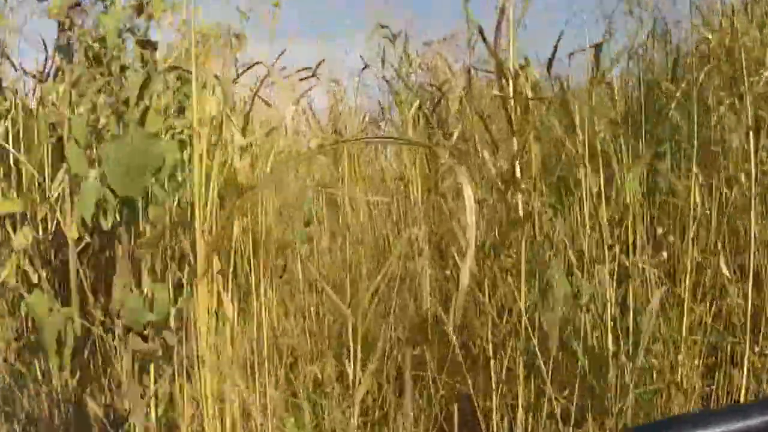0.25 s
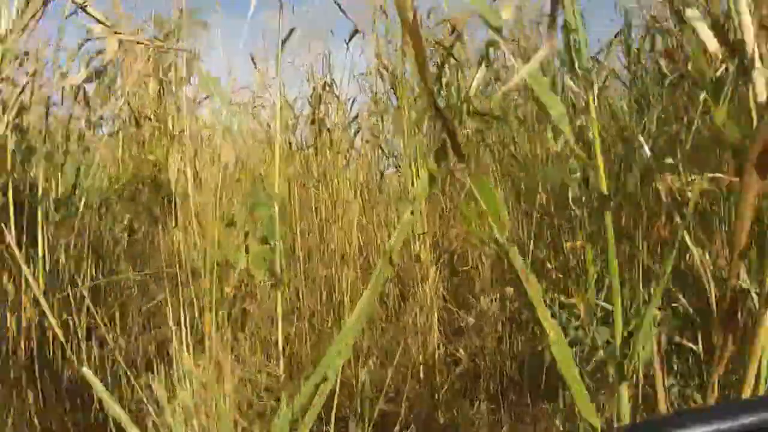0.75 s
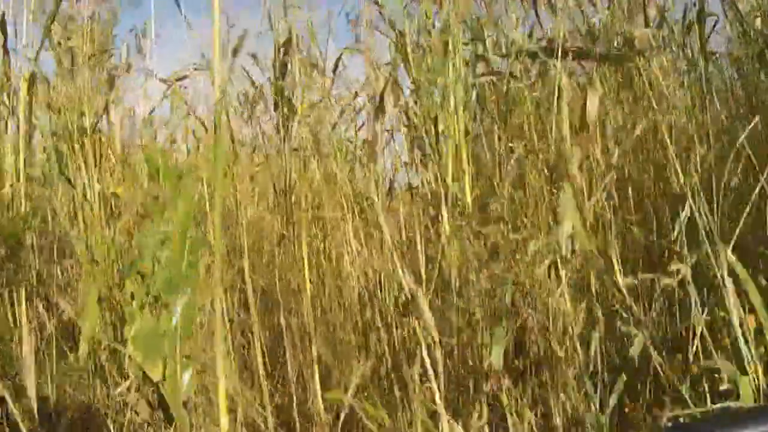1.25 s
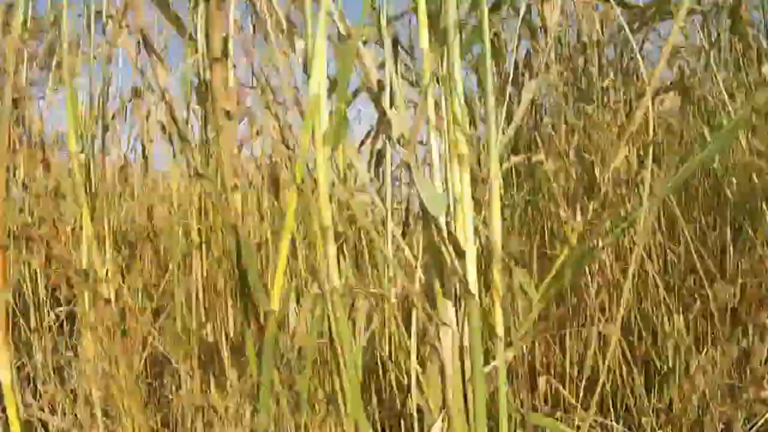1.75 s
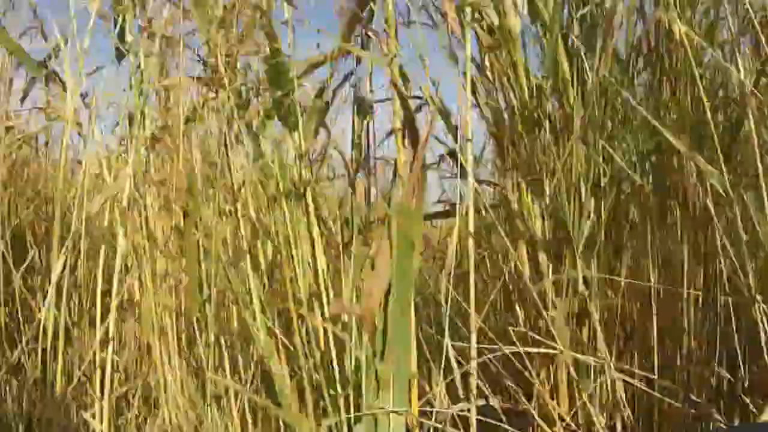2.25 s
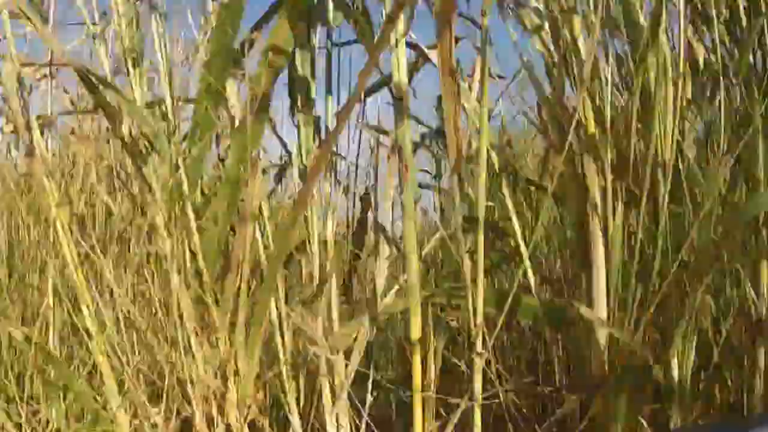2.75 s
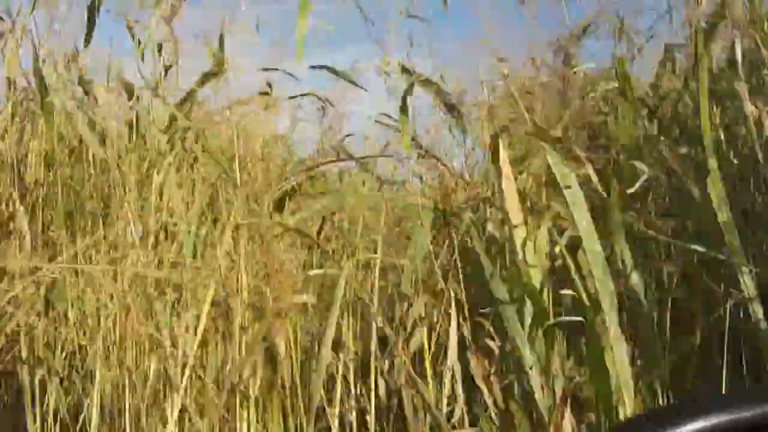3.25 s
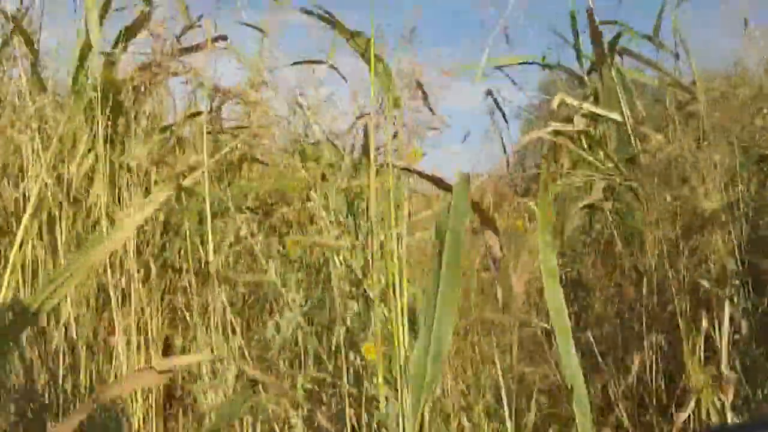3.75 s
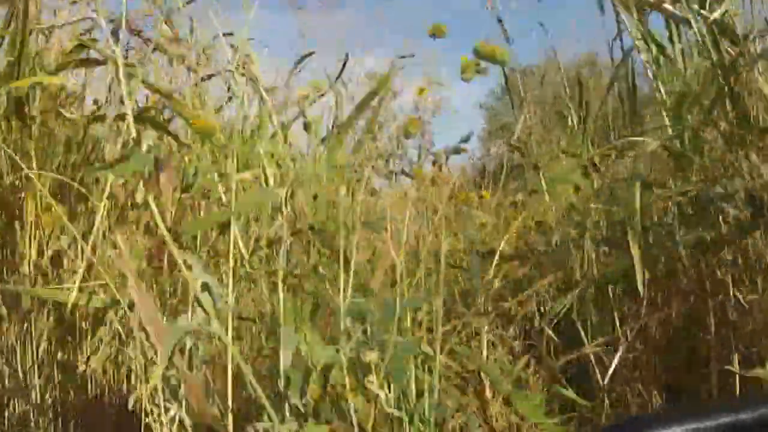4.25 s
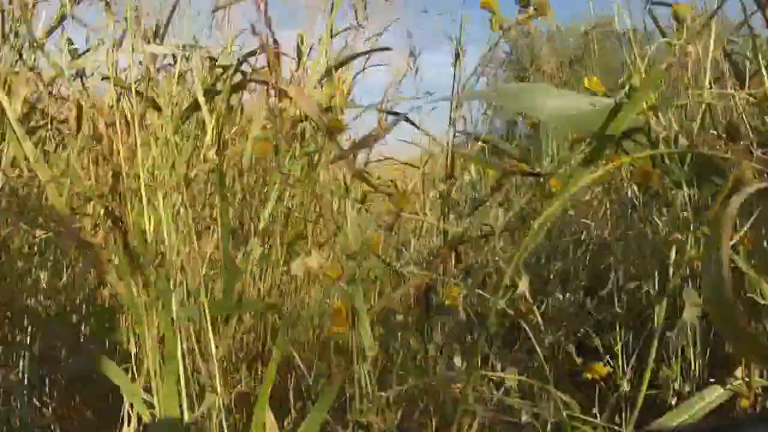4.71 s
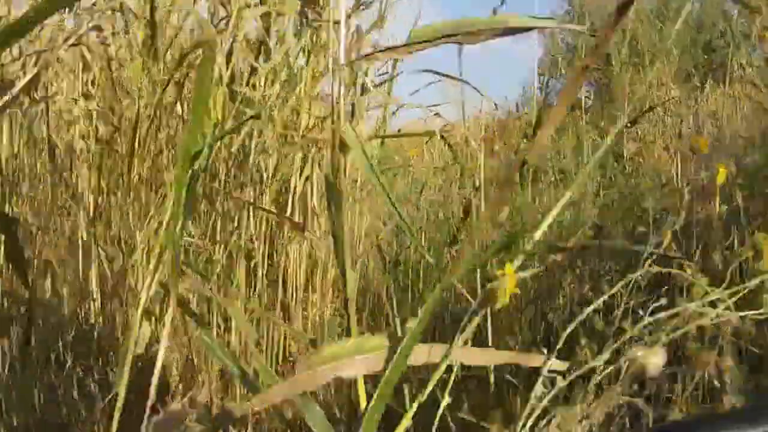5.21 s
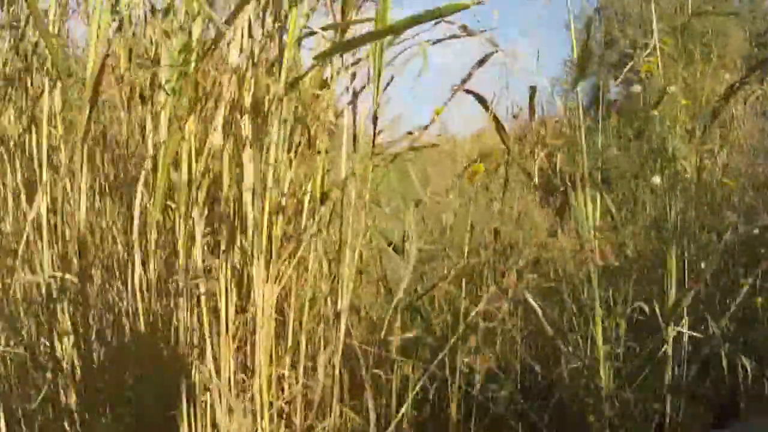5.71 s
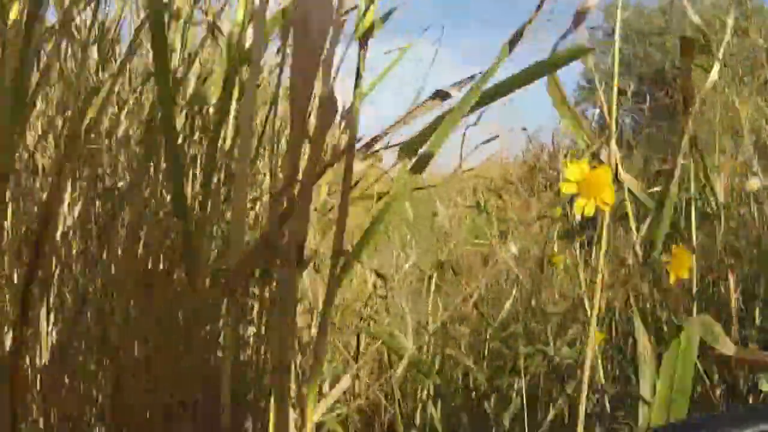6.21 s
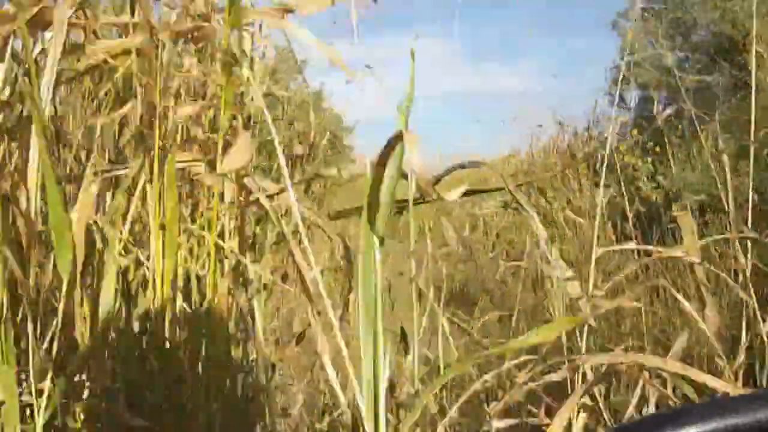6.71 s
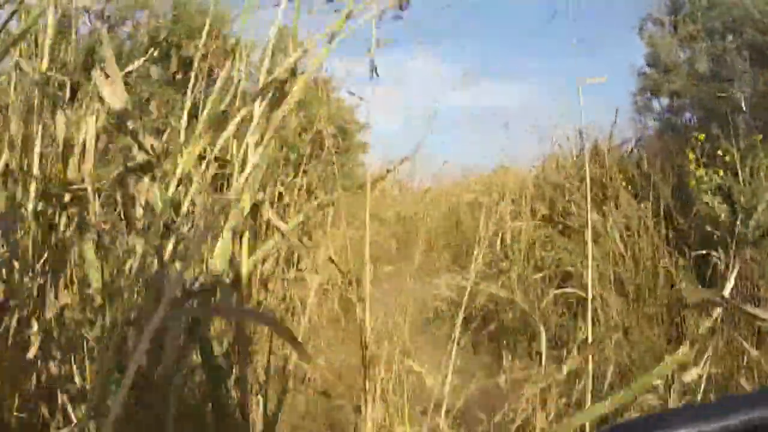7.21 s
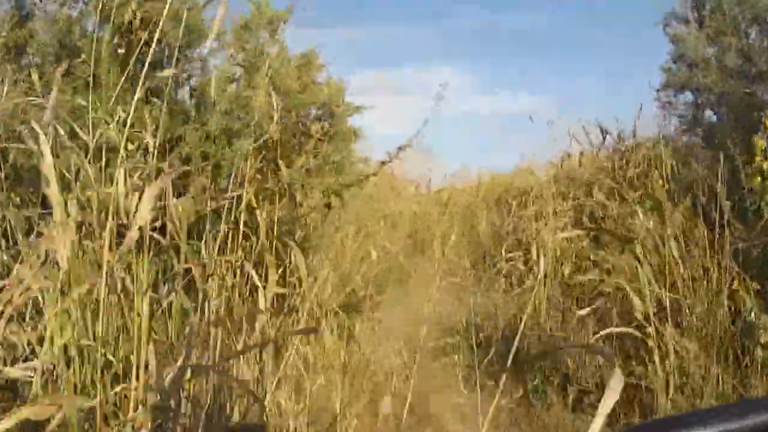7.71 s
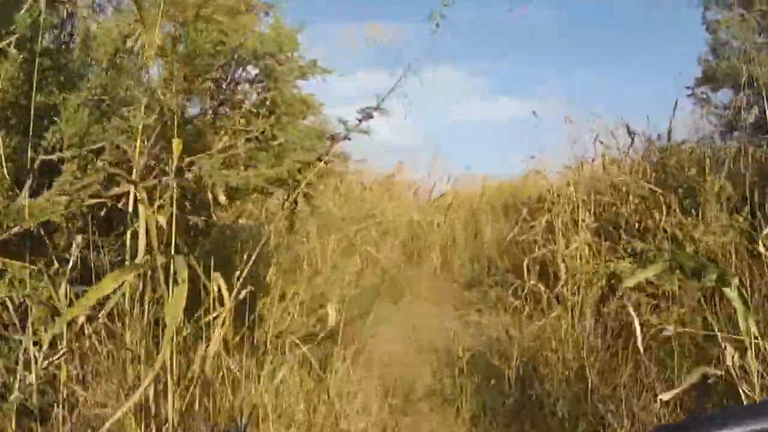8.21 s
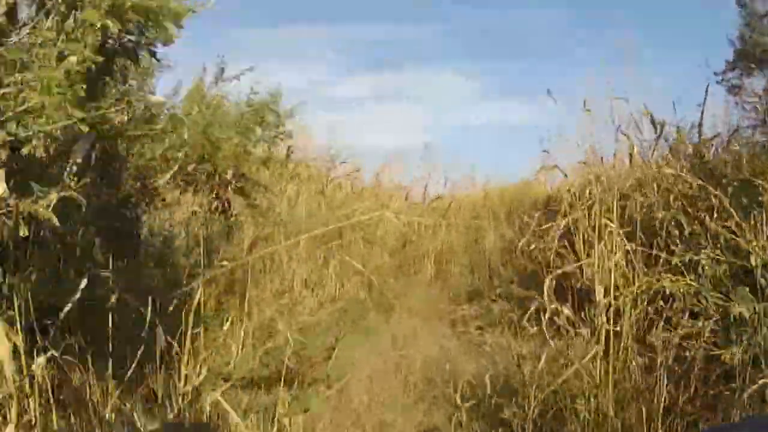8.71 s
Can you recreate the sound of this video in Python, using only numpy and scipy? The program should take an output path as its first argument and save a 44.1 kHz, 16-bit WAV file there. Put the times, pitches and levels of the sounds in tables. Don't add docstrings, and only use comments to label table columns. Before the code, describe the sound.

Close, boxy engine drone with heavy low vibration and hard plastic rattle, running without a break. Dry leaves scrape over the casing in crackling swells, while stalks knock, tick and snap against it. The strongest whacks come early, around the middle and later on, with the sound ducking and recovering. Toward the end the engine settles lower and the brushing thins. Coarse, slightly metallic treble.

```python
import sys
import numpy as np
from scipy import signal
from scipy.io import wavfile
from scipy.ndimage import uniform_filter1d

SR = 44100
rng = np.random.default_rng(int(sys.argv[2]) if len(sys.argv) > 2 else 0)


def generate_wav(signal):
    frames = np.transpose(np.atleast_2d(signal))
    scaled = np.clip(frames, -1, 1) * 32767
    pcm = np.round(scaled).astype(np.int16)
    wavfile.write(sys.argv[1], SR, pcm)


def convert_level_to_amplitude(level_db):
    exponent = np.asarray(level_db, float) / 20
    return 10 ** exponent


N = 395136
T = np.arange(N) / SR

# start [s], peak level [dB], pitch [Hz], width [Hz], recorder overload [dB].
SLAPS = [(1.5468, -2, 5000, 3000, 0), (1.5472, 0, 2900, 1500, 7), (2.1226, -1, 1750, 900, 7),
         (2.8016, -14, 3500, 4000, 0), (3.1472, -9, 3400, 4000, 1.5), (4.2962, -20, 2600, 400, 0),
         (4.7906, -1, 300, 1100, 8), (4.7913, -14, 4600, 3000, 0), (4.7917, -3, 2650, 600, 0),
         (5.3192, -28, 5500, 4000, 0), (5.5142, -28, 5500, 4000, 0), (5.5692, -27, 5500, 4000, 0),
         (5.6809, 1, 2250, 700, 10), (5.6811, -5, 5000, 3500, 0), (5.6813, -6, 800, 900, 0),
         (6.9682, -17, 1800, 900, 0), (7.3682, -8, 2650, 900, 2)]
# start [s], peak level [dB], pitch [Hz], width [Hz], recorder overload [dB].
KNOCKS = [(.5882, -16, 1700, 700, 1), (1.1012, -8, 2000, 500, .5), (1.1016, -24, 5500, 900, 0),
          (1.1502, -20, 1100, 600, 8), (1.3952, -18, 1100, 600, 6), (1.4262, -12, 1100, 900, 0),
          (2.1252, -11, 1470, 200, 0), (2.1332, -10, 2200, 200, 0), (3.3812, -12, 1100, 900, 0),
          (3.5862, -10, 2100, 900, 0), (4.2432, -10, 2350, 70, 6), (5.9032, -8, 2200, 500, 6),
          (6.6962, -14, 1950, 300, 0), (7.4212, -12, 2000, 250, 0), (8.6652, -13, 1100, 700, 0)]


def rms_one(x):
    return x / np.sqrt(np.mean(x ** 2) + 1e-20)


def drift(rate):
    r = np.exp(-80 * np.pi * rate / SR)
    noise = rng.standard_normal(N // 40 + 2002)
    slow = signal.lfilter([1], [1, -2 * r, r * r], noise)[2000:]
    return np.interp(np.arange(N) / 40, np.arange(len(slow)), rms_one(slow))


def resonance(x, hz, width_hz):
    r = np.exp(-np.pi * width_hz / SR)
    zeros = np.array([1, 0, -1]) * (1 - r * r) / 2
    return signal.lfilter(zeros, [1, -2 * r * np.cos(2 * np.pi * hz / SR), r * r], x)


def steep_resonance(x, hz, width_hz):
    return resonance(resonance(x, hz, width_hz), hz, width_hz)


def case(push, modes, patchy_db):
    ringing = np.zeros(N)
    for k, (hz, width_hz, db) in enumerate(modes):
        level = convert_level_to_amplitude(db + patchy_db * drift(3.8))
        ringing += (-1) ** k * level * resonance(push, hz, width_hz)
    return rms_one(ringing)


def crank():
    # time [s], firing rate [firings per s].
    speed = [(0.0, 33.1), (0.7, 38.3), (1.1, 39.45), (1.7, 38.03), (2.13, 37.45), (2.55, 34.0),
             (2.8, 33.25), (3.6, 32.5), (4.3, 32.75), (4.8, 32.5), (5.35, 35.65), (5.9, 38.1), (6.45, 39.3),
             (6.75, 38.8), (7.25, 34.9), (7.65, 34.4), (8.0, 33.5), (8.96, 33.75)]
    rate = np.interp(T, *np.transpose(speed))
    slip = .3 * np.interp(T, [.17, .24], [1, 0])
    return rate, np.cumsum(rate) / SR + .03 + slip


def rumble(low_db):
    # centre [Hz], width [Hz], rms level [dB].
    bands = [(60, 95, -31), (117, 98, -39), (161, 81, -43), (435, 324, -39.5), (700, 640, -42.5),
             (1650, 880, -49)]
    shudder = np.zeros(N)
    for hz, width_hz, db in bands:
        band = rms_one(steep_resonance(rng.standard_normal(N), hz, width_hz))
        shudder += convert_level_to_amplitude(db + 1.9 * drift(3.0)) * band
    return shudder * convert_level_to_amplitude(0.93 * (low_db + 22.5))


def swishes():
    # centre time [s], length [s], level [dB], pitch [Hz], width [Hz].
    slides = [
        (.19, .09, -46, 5400, 1000),
        (1.46, .09, -38, 5400, 1000),
        (8.69, .07, -42, 5300, 1300),
    ]
    noise, out = rng.standard_normal(N), np.zeros(N)
    for s, length, db, hz, width_hz in slides:
        swell = np.exp(-(2 * (T - s) / length) ** 2)
        out += convert_level_to_amplitude(db) * swell * rms_one(steep_resonance(noise, hz, width_hz))
    return out


def brushing():
    # time [s], level [dB].
    grass = [(.1, -52), (.35, -44), (.6, -47), (1.0, -37), (1.5, -36), (1.7, -40), (1.9, -34.5),
             (2.45, -40.5), (2.7, -47), (3.05, -37.5), (3.3, -45.5), (4.25, -45), (4.6, -44), (5.4, -41),
             (6.85, -34.5), (7.6, -39), (8.2, -46), (8.7, -41.5)]
    # pitch [Hz], width [Hz], level [dB].
    brush_modes = [(2655, 100, 2), (3150, 270, -2.5), (3670, 125, 1.5), (3770, 122, 0), (4220, 25, -4),
                   (4630, 250, -19), (5060, 90, -29), (5590, 2400, -27), (5630, 370, -8)]
    brush_db = np.interp(T, *np.transpose(grass)) - 0.4 * drift(12.0)
    born = rng.random(N) < 250 * convert_level_to_amplitude(5.0 * drift(12.0)) / SR
    grain_db = 5.6 * np.minimum(rng.exponential(1, N), 4)
    grains = born * convert_level_to_amplitude(grain_db) * rng.choice([-1, 1], N)
    hiss = 0.88 * convert_level_to_amplitude(2.8 * drift(41.0)) * rng.standard_normal(N)
    return convert_level_to_amplitude(brush_db) * case(rms_one(grains) + hiss, brush_modes, patchy_db=1.2)


def burst(noise, hz, width_hz, t60, rise):
    t = np.arange(len(noise)) / SR
    contact = noise + 130 / width_hz * np.sin(2 * np.pi * hz * t)
    envelope = convert_level_to_amplitude(-60 * t / t60) * (1 - np.exp(-t / rise))
    rung = steep_resonance(contact * envelope, hz, 1.5 * width_hz)
    return rung / np.max(np.abs(rung))


def rattle_ticks():
    # start [s], length [s], peak level [dB], loss on every second tap [dB], case modes [dB].
    leans = [
        (1.1428, .19, -22, 7, 10),
        (1.4032, .12, -18, 1, 4),
        (1.5818, .09, -26, 4, 3),
        (5.2624, .17, -20, 5, 0),
        (5.483, .15, -16, -1, 0),
        (5.7807, .04, -22, 1, 0),
    ]
    pitch_hz, spread_db = 3090, 6
    turns, rows = crank()[1], []
    chances = rng.standard_normal((len(leans), 12, 2))
    for (start, length, db, weak_db, body_db), chance in zip(leans, chances):
        first, last = np.interp([start, start + length], T, turns)
        for k, s in enumerate(np.interp(np.arange(first, last), turns, T)):
            late = .001 * chance[k, 0] * (k > 0)
            tap_db = db - weak_db * (k % 2) + spread_db * chance[k, 1]
            rows.append((s + late, tap_db, pitch_hz, body_db))
    return rows


def stalks():
    # start [s], peak level [dB], pitch [Hz], case modes above the tick [dB].
    lone_ticks = [(0.325, -40, 3720, 33), (0.9093, -41, 2870, 5), (1.0839, -32, 3180, 5),
                  (1.733, -14, 4030, 7), (1.7853, -36, 3630, 5), (1.8292, -19.5, 3620, 2),
                  (2.126, -16, 2720, 1), (2.3301, -24, 3000, 23), (2.5237, -26, 2800, 3),
                  (2.801, -20.5, 2870, 18), (3.148, -18, 3560, -14), (3.4116, -21, 2890, -1),
                  (3.5896, -27, 3070, 18), (4.2468, -19, 4570, 16), (4.2945, -26, 4120, -6),
                  (4.362, -30, 3100, -14), (4.577, -19.5, 3050, -5), (4.607, -21, 3090, -4),
                  (5.681, -11, 3190, -5), (5.9843, -32, 2950, 15), (6.132, -27, 3670, 14),
                  (6.3, -21, 3140, 20), (6.9246, -21, 3300, 11), (6.9681, -23, 2800, 16),
                  (7.138, -18.5, 3660, 17), (7.3671, -10.5, 3660, 19.5), (7.4614, -16, 2720, -4),
                  (8.6678, -18, 3270, 0)]
    out = np.zeros(N + 4096)
    noises = rng.standard_normal((72, 3, 2048))
    for (s, db, hz, body_db), (crack, bright, dull) in zip([*lone_ticks, *rattle_ticks()], noises):
        tick = burst(bright, hz, width_hz=520, t60=.055, rise=.0012)
        tick += convert_level_to_amplitude(-22.0) * burst(crack, 4600, width_hz=3000, t60=.008, rise=.0002)
        thud = convert_level_to_amplitude(body_db - 9.5) * burst(dull, 2330, width_hz=580, t60=.035, rise=.0002)
        out[round(s * SR):][:2048] += convert_level_to_amplitude(db - 2.0) * (tick + thud)
    for blows, t60 in ((SLAPS, .014), (KNOCKS, .036)):
        noises = rng.standard_normal((len(blows), 4096))
        for (s, db, hz, width_hz, _), noise in zip(blows, noises):
            out[round(s * SR):][:4096] += convert_level_to_amplitude(db) * burst(noise, hz, width_hz, t60, rise=.0006)
    return out[:N]


def shake_db(rate):
    full_hz, loss_db_per_hz = 34.5, 0.24
    jolt_s, sink_s, back_s = 0.2, 0.029, .035
    away = np.where(T < jolt_s, (jolt_s - T) / sink_s, (T - jolt_s) / back_s)
    return -5 - loss_db_per_hz * np.maximum(rate - full_hz, 0) - 23 * np.exp(-away)


def group_db(shared, light_db, load_share, db_per_hz, wander_db):
    # time [s], level above light load [dB].
    load = [(0, -2.5), (.16, -1), (.25, 4), (1.0, 4), (1.5, 9), (1.9, 4.5), (2.4, 4.5), (2.72, -2),
            (3.1, 2), (3.28, -1.5), (4.4, -1), (5.1, -0.5), (5.4, 5.5), (6.0, 5), (7.1, 5), (7.6, 3),
            (8.0, -2.5), (8.6, -0.5)]
    load_db = load_share * np.interp(T, *np.transpose(load))
    wander = .7 * shared + .7 * drift(4.0)
    return light_db + load_db + db_per_hz * (crank()[0] - 33) + wander_db * wander


def firing_push(turns, clean, gate_db, uneven_db):
    at = np.flatnonzero(np.diff(np.floor(turns)))
    kicks = np.zeros(N)
    kick_db = uneven_db * rng.standard_normal(400)[:len(at)] - 0.78 * (np.arange(len(at)) % 2)
    kicks[at] = convert_level_to_amplitude(kick_db)
    flutter = .6 * drift(30.0) + .6 * drift(150.0)
    swell = convert_level_to_amplitude(gate_db * np.cos(2 * np.pi * (turns - .08)) + uneven_db * flutter)
    clatter = rms_one(swell * rng.standard_normal(N))
    return clean * rms_one(kicks) + np.sqrt(1 - clean ** 2) * clatter


def orders(rate, turns):
    # multiple of the firing rate, level at light load [dB], gain with speed [dB per Hz], lead [cycles].
    clean_orders = [(1.5, -36, 2.3, .15), (2, -29.5, .4, -.15), (2.5, -40, 1.9, .09), (3, -32, -.2, -.15),
                    (3.5, -47, 0, .45), (4, -43, 0, -.06), (5, -42, 0, -.4)]
    # pitch [Hz], half width [Hz], lift [dB].
    frame_modes = [(113, 5, 7), (140, 7, 13)]
    out = np.zeros(N)
    for multiple, db, db_per_hz, lead in clean_orders:
        lift_db = sum(top_db / (1 + ((multiple * rate - hz) / half_hz) ** 2)
                      for hz, half_hz, top_db in frame_modes)
        level = convert_level_to_amplitude(db + lift_db + db_per_hz * (rate - 33) + 1.2 + 2.2 * drift(1.5))
        cycles = multiple * turns + lead + .05 * drift(2.5)
        out += np.sqrt(2) * level * np.cos(2 * np.pi * cycles)
    return out


def gear_whine(rate, turns, middle_db):
    # teeth per firing, level against the middle modes [dB], speed wander [cycles].
    gears = [(26.5, -4.5, .28), (13.7, -6, .14)]
    out = np.zeros(N)
    for teeth, db, wander in gears:
        level = convert_level_to_amplitude(middle_db + db + 1.3 * (rate - 36.5) + 1.5 * drift(12.0))
        whine = level * np.cos(2 * np.pi * (teeth * turns + wander * drift(9.0)))
        out += np.sqrt(2) * resonance(whine, teeth * 39, teeth * 4)
    return out


def engine(low_db, middle_db, high_db):
    # pitch [Hz], width [Hz], level [dB].
    low_modes = [(240.7, 14.8, 1.5), (263.2, 28.2, -1.5), (290.7, 12.6, 2), (327.6, 15, -15.5),
                 (431.8, 32, -9), (462.7, 26.5, -5.5), (527, 32, -17), (590.5, 40, -11.5),
                 (613.7, 22.5, -7), (644.4, 19.7, -10.5)]
    # pitch [Hz], width [Hz], level [dB].
    middle_modes = [(851, 29, -14), (899, 22.5, -10), (1035.6, 65.6, -3), (1185, 276, -10.5),
                    (1350, 148, -11.5), (1501, 20, -15.5)]
    # pitch [Hz], width [Hz], level [dB].
    high_modes = [(1958, 100, -11.5), (2221, 43, -5.5), (2342, 132, -8.5), (2506, 228, -13),
                  (2604, 67, -10.5)]
    rate, turns = crank()
    shake = np.sqrt(2) * convert_level_to_amplitude(shake_db(rate) + 1.2) * np.cos(2 * np.pi * turns)
    out = shake + orders(rate, turns) + gear_whine(rate, turns, middle_db)
    firing = turns - .4 + .07 * (rate - 33)
    low = case(firing_push(firing, .78, gate_db=3.0, uneven_db=1.5), low_modes, patchy_db=1.8)
    middle = case(firing_push(firing, .35, gate_db=2.5, uneven_db=2.5), middle_modes, patchy_db=.8)
    high = case(firing_push(firing + .1, .25, gate_db=2.5, uneven_db=2.4), high_modes, patchy_db=.7)
    return out + convert_level_to_amplitude(low_db) * low + convert_level_to_amplitude(middle_db + 0.5) * middle + convert_level_to_amplitude(high_db) * high


def recover(over_db):
    fall_db = 45 * T
    cut = np.maximum.accumulate(over_db + fall_db) - fall_db
    return uniform_filter1d(cut, size=88)


def scene():
    shared = drift(4.0)
    low_db = group_db(shared, light_db=-22, load_share=0.97, db_per_hz=0.06, wander_db=-0.2)
    middle_db = group_db(shared, light_db=-31.5, load_share=.5, db_per_hz=0.84, wander_db=1.0)
    high_db = group_db(shared, light_db=-30.5, load_share=1.08, db_per_hz=-0.0248, wander_db=0.32)
    steady = rumble(low_db) + swishes() + brushing() + engine(low_db, middle_db, high_db)
    steady = steady * np.minimum((T[-1] - T) / .003, 1)
    over_db = np.zeros(N)
    for s, _, _, _, blow_over_db in [*SLAPS, *KNOCKS]:
        over_db[round((s + .0015) * SR)] = max(blow_over_db, 0)
    return (steady * convert_level_to_amplitude(-recover(over_db)) + stalks())[None, :]


def top_cut(x):
    return signal.sosfilt(signal.butter(12, 16420, fs=SR, output="sos"), x)


def record(dry):
    ceiling = .94
    over_db = np.maximum(20 * np.log10(np.abs(dry[0]) / ceiling + 1e-9), 0)
    limited = np.clip(dry[0] * convert_level_to_amplitude(-.7 * recover(over_db)), -.95, .95)
    held = np.repeat(signal.resample_poly(limited, 40, 147), 4)
    out = signal.resample_poly(held, 147, 160)[:N]
    out = signal.sosfilt(signal.ellip(12, .3, 70, 15250, fs=SR, output="sos"), out)
    return top_cut(out[None, :])


dry = scene()
out = record(dry)
generate_wav(out)
```